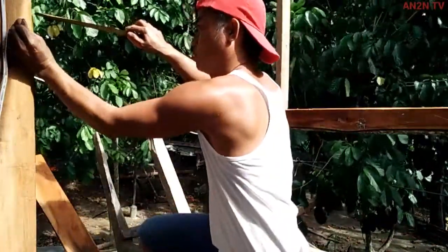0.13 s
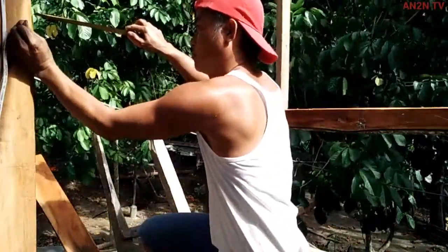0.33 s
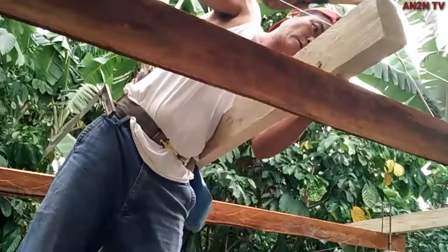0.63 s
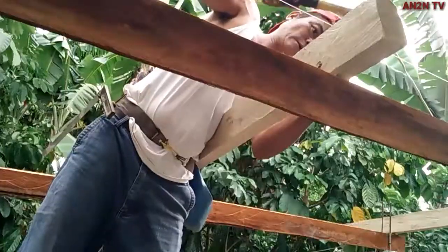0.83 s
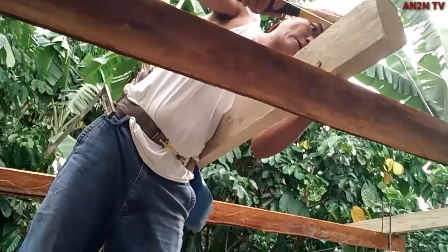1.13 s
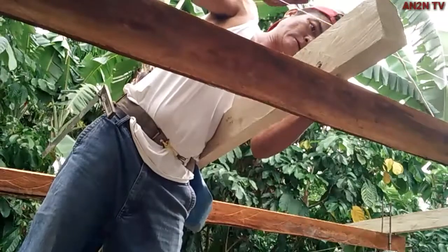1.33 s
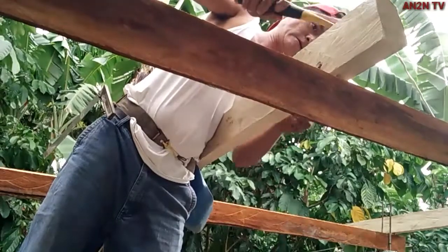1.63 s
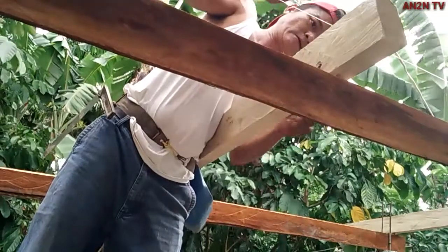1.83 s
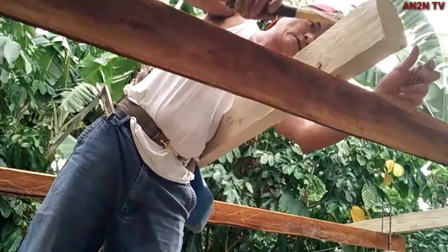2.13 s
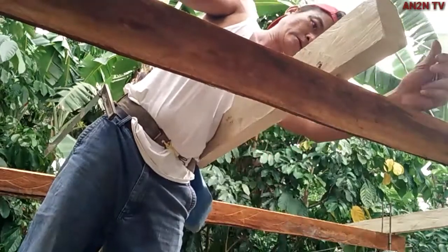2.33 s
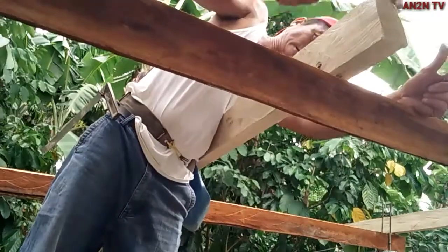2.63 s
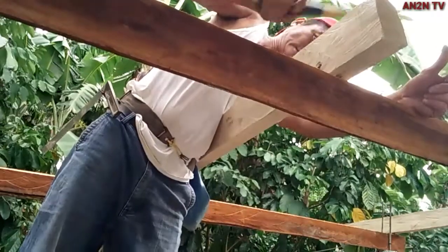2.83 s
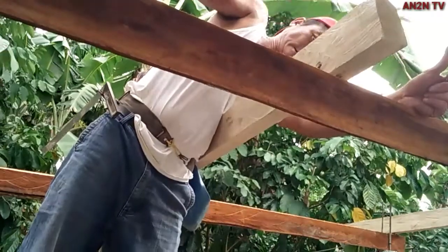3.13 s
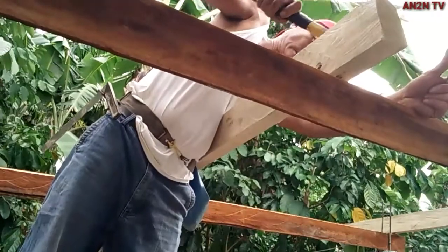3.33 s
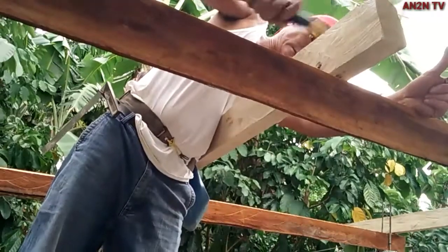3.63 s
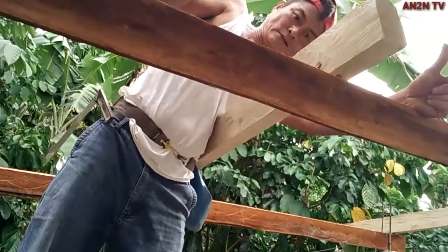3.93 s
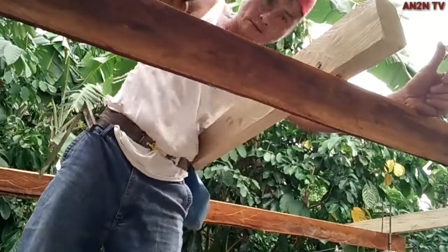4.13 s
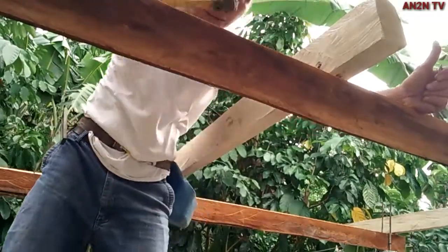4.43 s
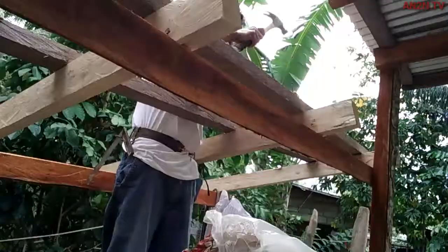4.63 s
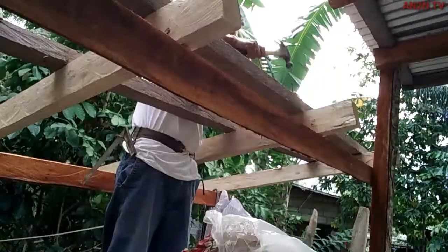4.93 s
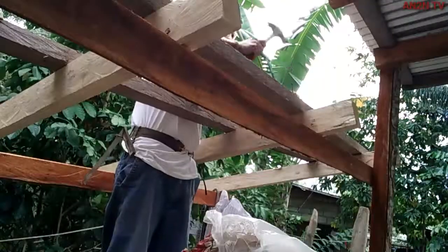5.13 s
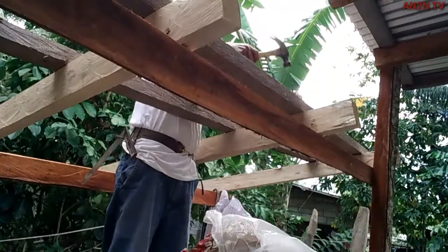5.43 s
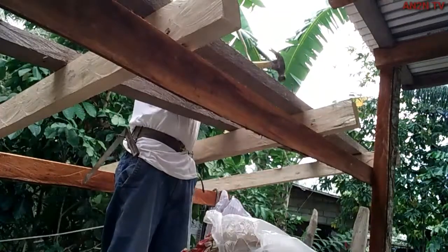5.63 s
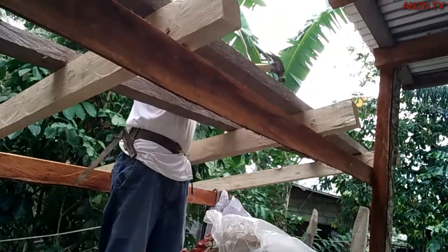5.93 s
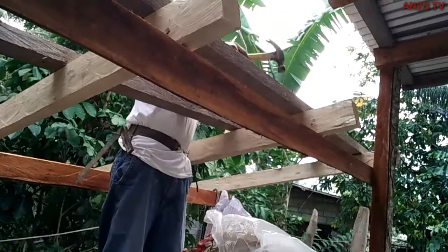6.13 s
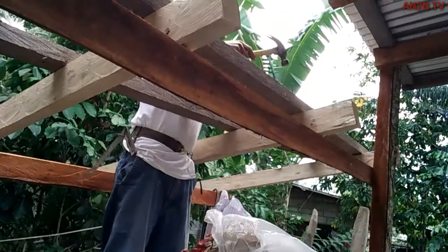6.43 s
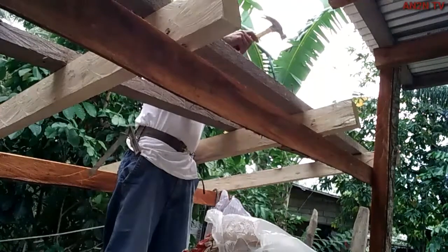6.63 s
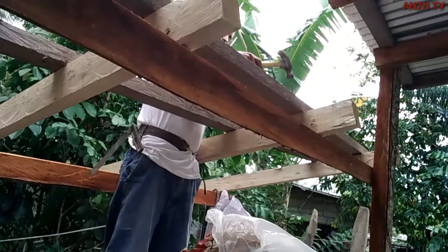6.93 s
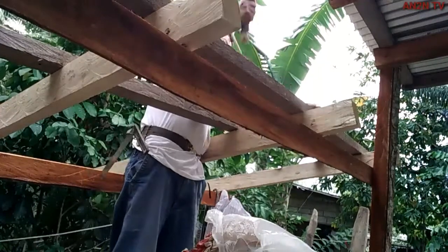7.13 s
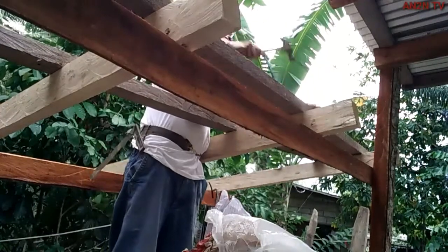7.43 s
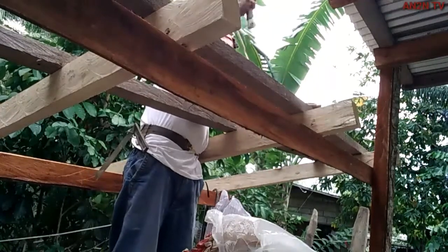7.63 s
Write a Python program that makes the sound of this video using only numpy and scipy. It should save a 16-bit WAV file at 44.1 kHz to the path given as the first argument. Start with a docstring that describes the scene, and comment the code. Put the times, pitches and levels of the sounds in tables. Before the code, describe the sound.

Close outdoor carpentry in a quiet garden. For the first 0.7 seconds there is low rumble, soft throbbing bumps and a few light wooden taps. From 0.84 a hammer drives a nail into roof framing: blows at about 0.84, 1.24, 1.72, 2.22 and a weaker one at 2.69, then three harder ones at 3.04, 3.44 and 3.82. Each has a low push, a bright steel crack, short woody ringing and a swelling hollow echo; loose timber knocks back just after. A pause follows, with faint washes of echo. Blows resume at 4.96 and 5.35, the latter with a clear nail ping, then a dull bare-wood thump at 5.85. Very faint gliding calls, like distant fowl, drift through from 4.8 to 7.1. Light taps and low bumps come around 6.6 to 7.0, then a softened blow at 7.13, a strong crack at 7.41 and a last small tap at 7.63 as the echo fades.

```python
"""A claw hammer drives nails into timber roof framing outdoors, in three runs of blows.
Each blow bends the beam with a low push, cracks on the nail and rings the wood as a set of fading notes.
A wash of echo, made of shaped noise, follows each blow: it swells, hums with steady notes and dies.
Loose wood knocks back. Around the runs come light taps, soft low bumps, short nail pings,
soft washes of echo, a rumble and hush of air, and faint gliding calls from far off."""
import sys
import numpy as np
from scipy import signal
from scipy.fft import rfft, irfft, next_fast_len
from scipy.io import wavfile

SR = 44100
rng = np.random.default_rng(int(sys.argv[2]) if len(sys.argv) > 2 else 0)


def store_wav(level_fs):
    """Save 16-bit WAV to argv[1]."""
    pcm = np.round(np.clip(np.atleast_2d(level_fs), -1, 1) * 32767)
    wavfile.write(sys.argv[1], SR, pcm.T.astype(np.int16))


N = 342657  # length of the scene in samples
# In all the tables, a t60 is the time a sound takes to fade by 60 dB.


def amp(db):
    """Turn decibels into a gain."""
    return 10 ** (np.asarray(db) / 20)


def unit(x):
    """Scale x to an rms (average strength) of 1."""
    return x / np.sqrt(np.mean(x ** 2) + 1e-20)


def along(points, hz):
    """Read a curve of (pitch [Hz], value) points at any pitch, on a log axis."""
    f, v = np.transpose(points)
    return np.interp(np.log(hz + 1), np.log(f + 1), v)


def filtered(x, response):
    """Multiply the spectrum of x by a response that depends on frequency."""
    size = next_fast_len(len(x) + 8192)
    spectrum = rfft(x, size) * response(np.fft.rfftfreq(size, 1 / SR))
    return irfft(spectrum, size)[:len(x)]


def causal(x, gain, size=8192):
    """Colour x by a gain of frequency, with nothing sounding before its start."""
    # folding the cepstrum (the spectrum of the log gain) gives the earliest possible response
    cepstrum = irfft(np.log(gain(np.fft.rfftfreq(size, 1 / SR))))
    cepstrum[1:size // 2] *= 2
    cepstrum[size // 2 + 1:] = 0
    response = irfft(np.exp(rfft(cepstrum)))[:size // 2]
    return signal.fftconvolve(x, response)[:len(x)]


def humps(modes, hz):
    """Gain of a set of resonances (pitch [Hz], width [Hz], level [dB])."""
    powers = (amp(db) ** 2 / (1 + (2 * (hz - centre) / width) ** 2) for centre, width, db in modes)
    return np.sqrt(sum(powers))


def noise(spectrum, size, lift=lambda hz: 1):
    """Noise of rms 1 with a given spectrum, lifted at resonances."""
    white = rng.standard_normal(size)
    return unit(filtered(white, lambda hz: amp(along(spectrum, hz)) * lift(hz)))


def fading(x, t60s, length):
    """Let each frequency of x die at its own speed."""
    hz, t, z = signal.stft(x, SR, nperseg=256)
    t60 = length * along(t60s, hz)[:, None]
    return signal.istft(z * amp(-60 * t / t60), SR, nperseg=256)[1][:len(x)]


def grainy(size, depth_db, rate_hz):
    """A gain that jumps about at random, breaking a noise into grains."""
    jumps = unit(filtered(rng.standard_normal(size), lambda hz: np.exp(-(hz / rate_hz) ** 2)))
    return unit(amp(depth_db * jumps))


def add(track, s, x):
    """Mix x into the track from time s."""
    part = track[max(round(s * SR), 0):][:len(x)]
    part += x[:len(part)]


# How loud the air is over time: (time [s], rumble level [dB], hush level [dB])
AIR_LEVELS = [(0, -45.5, -65), (0.42, -47.5, -71), (0.62, -54, -93), (0.76, -64, -72.5),
              (4.401, -74, -72.5), (6.401, -74.5, -73.5), (7.0, -74, -72.5), (7.77, -73, -62)]
# Colour of the low rumble: (pitch [Hz], level [dB per Hz])
RUMBLE_COLOUR = [(20, -7), (50, 2.5), (90, -5), (130, -16.5), (250, -29.5), (800, -72.5)]
# Colour of the hush of the garden: (pitch [Hz], level [dB per Hz])
HUSH_COLOUR = [(88, -23), (140, -9), (220, -28), (293, -10), (375, -20.5), (790, -12.5), (2480, -24.5),
               (2680, -27.5), (2900, -29.5), (3930, -33.5), (14400, -38.5)]


def air(rustle_db=2.5, rustle_hz=20):
    """Low rumble at the microphone and the hush of the garden, whose leaves rustle unevenly."""
    s, rumble_db, hush_db = np.transpose(AIR_LEVELS)
    level = lambda db: amp(np.interp(np.arange(N) / SR, s, db))
    hush = noise(HUSH_COLOUR, N)
    # three octaves from 300 Hz up rustle, each on its own
    octaves = [filtered(hush, lambda hz: (hz >= low) & (hz < 2 * low)) for low in 300 * 2 ** np.arange(3)]
    rustle = sum(leaves * (grainy(N, rustle_db, rustle_hz) - 1) for leaves in octaves)
    return level(rumble_db) * noise(RUMBLE_COLOUR, N) + level(hush_db) * (hush + rustle)


# Runs of soft low throbs: (start [s], length of run [s], rate [throbs per s], pitch [Hz], mean level [dB])
THROB_RUNS = [(0.005, .46, 17.3, 68, -42.5), (6.645, .21, 16.2, 100, -61), (6.887, .22, 21, 116, -56)]
# Single heavy low bumps: (time of middle [s], pitch [Hz], level [dB])
SINGLE_BUMPS = [(0.242, 66.4, -33), (1.257, 66, -26), (2.71, 95.4, -30.5)]
THROB_SCATTER_DB = 2.5  # how unevenly strong the throbs of a run are


def throbs(length=0.03):
    """Soft low bumps, each a short swell of a low tone, alone or in even runs of uneven strength."""
    track, t = np.zeros(N), np.arange(int(length * SR)) / SR
    bumps = list(SINGLE_BUMPS)
    for s, span, rate, hz, db in THROB_RUNS:
        for delay in np.arange(0, span, 1 / rate):
            bumps.append((s + delay, hz, db + rng.normal(0, THROB_SCATTER_DB)))
    for s, hz, db in bumps:
        add(track, s - length / 2, amp(db) * np.sin(2 * np.pi * hz * t) * np.hanning(len(t)))
    return track


# t60 of the low notes; above the knee it shortens by this power of pitch
WOOD_T60_S, WOOD_KNEE_HZ, WOOD_DAMPING = .55, 260, 0.67
MODE_SCATTER_DB = 2  # how much a note's strength varies from one ring to the next
WOOD_DRIFT = 0.0041  # share by which its pitch varies


def ringing(modes, length, size=SR * 3 // 4):
    """The clear notes (modes) of a joint, the high ones dying first; starts at about rms 1."""
    t = np.arange(size) / SR
    hz, db = np.transpose(modes)[:, :, None]
    hz = hz * np.exp(WOOD_DRIFT * rng.standard_normal(hz.shape))
    t60 = WOOD_T60_S * np.minimum(1, WOOD_KNEE_HZ / hz) ** WOOD_DAMPING
    sizes = amp(db + rng.normal(0, MODE_SCATTER_DB, hz.shape))
    # all start from rest, neighbouring modes in opposite directions
    signs = (-1) ** np.arange(len(hz))[:, None]
    partials = signs * sizes * np.sin(2 * np.pi * hz * t) * amp(-60 * t / (t60 * length))
    return partials.sum(axis=0) / np.sqrt(np.sum(sizes ** 2) / 2)


# Light taps and ticks: (time [s], wood level before a common lift [dB], steel level [dB], t60 [s])
TAP_TOUCHES = [(0.136, -50.5, -65, 0.19), (0.162, -48, -61, 0.084), (0.365, -60, -87, 0.12),
               (2.644, -53.5, -56, 1), (6.577, -59, -87, 0.18), (6.759, -48.5, -58, 0.092),
               (7.634, -43, -49, 0.04)]
# Colour of the wood in a tap: (pitch [Hz], level [dB per Hz])
TAP_WOOD_COLOUR = [(150, -48), (500, -10), (1300, 1), (2100, -4), (2500, -17.5), (8000, -43.5)]
# Colour of the steel in a tap: (pitch [Hz], level [dB per Hz])
TAP_STEEL_COLOUR = [(2000, -15), (6500, -7), (10000, -2), (14000, -14)]


def taps(ring_db=-2, tail_db=-20, tail_t60=0.92, wood_lift_db=6.0):
    """Light touches of hammer and nail on the wood, each with a faint, slower-fading tail."""
    track, t = np.zeros(N), np.arange(SR // 3) / SR
    for s, wood_db, steel_db, t60 in TAP_TOUCHES:
        ring = ringing(JOINT_A_MODES, 1, size=len(t))
        ring = filtered(ring, lambda hz: amp(along(TAP_WOOD_COLOUR, hz)))
        wood = amp(ring_db) * ring + .5 * noise(TAP_WOOD_COLOUR, len(t))
        steel = noise(TAP_STEEL_COLOUR, len(t))
        touch = amp(wood_db + wood_lift_db) * wood + amp(steel_db) * steel
        decay = amp(-60 * t / t60) + amp(tail_db - 60 * t / tail_t60)
        add(track, s, touch * decay * (1 - np.exp(-t / 0.00059)))
    return track


# Times at which the hammer moves to the next place: time [s]
MOVE_TIMES = [2.9, 4.5, 5.6, 6.5]
# Clear notes of the wood around each of four nails: (pitch [Hz], level [dB])
JOINT_A_MODES = [(129, -6.5), (196, -8), (292, 0.0), (444, -3.5), (608, -7.5), (753, -4), (796, -4.5),
                 (834, -5), (915, -3.5), (974, -2.5), (1173, -7), (1216, -2.5), (1402, -9), (1464, -1.5),
                 (1711, -5.5), (1773, -5), (2005, -11), (2269, -12), (2314, -4), (2527, -2.5), (2812, -9),
                 (3087, -12.5)]
JOINT_B_MODES = [(131, -7), (180, -10.5), (296, -3.5), (436, -15), (616, -7.5), (726, -4), (850, -5.5),
                 (909, -1.5), (971, -4.5), (1017, -2), (1203, -2.5), (1297, -1.5), (1464, -4.5), (1507, 3),
                 (1571, -3), (1709, 0.5), (1779, 2), (2034, -5), (2077, -6.5), (2123, -6.5), (2336, -12.5),
                 (2562, -8), (2815, -14), (3092, -14.5)]
JOINT_C_MODES = [(185, -4), (279, -9.5), (462, -4.5), (594, -6), (659, -11), (718, -8.5), (885, 0),
                 (944, -3.5), (1071, -7.5), (1135, -10.5), (1216, -12.5), (1326, -7), (1466, 0), (1593, -7),
                 (1649, -6.5), (1902, -6), (1956, -13), (1994, -4), (2271, -5.5), (2667, -10), (2912, -6)]
JOINT_D_MODES = [(234, -15.5), (285, -12), (331, -9.5), (422, -15), (479, -14), (592, -11), (667, -8),
                 (740, -17), (839, -14.5), (974, -2.5), (1044, -2.5), (1141, -6.5), (1181, -6),
                 (1305, -5.5), (1458, -3), (1652, -9), (1744, -0.5), (1999, -4.5), (2277, -9.5)]
# Clear notes of a dull blow on bare wood: (pitch [Hz], level [dB])
BARE_WOOD_MODES = [(157.6, 9), (201, -1), (262, -0.5), (292, 2.5), (435, 1.5), (464, 3), (530, -4),
                   (599, -1.5), (948, -17), (1290, -10), (1403, 3)]
# Bright resonances of each nail under the hammer head, before the wood grips it:
# (pitch [Hz], width [Hz], level [dB])
NAIL_A_MODES = [(3700, 61, 4.5), (6100, 560, -2.5), (10100, 340, -0.5), (10850, 71, -4), (12250, 17, -2.5)]
NAIL_B_MODES = [(3633, 17, -12), (6200, 880, -0.5), (8130, 510, 4), (8700, 33, 0.5), (10000, 130, -6)]
NAIL_C_MODES = [(3400, 25, -3), (4300, 100, -2.5), (6670, 270, 2.5), (7900, 56, -2.5), (10000, 31, -5),
                (12800, 100, -7)]
NAIL_D_MODES = [(4490, 72, 0.5), (5470, 40, 2.3), (6400, 38, 8), (7600, 69, 6.1), (9000, 720, 4.8)]
# How the timber yields at each place in turn, at the first blow there: (thud over force [dB],
# knock over force [dB], clack over knock [dB], rafter pitch [Hz], rafter level [dB])
TIMBER_YIELD = [(-10, -4.5, -0.5, 292, 3.5), (-8.5, -1, 0.5, 297, -2), (-13.5, 3.5, 1.5, 170, -1),
                (-5, -5.5, 0.5, 180, -15), (-11.5, -4, 1.5, 420, -6.5)]


def place(s):
    """The wood, the nail and the timber's yield where the hammer works at time s."""
    spots = [(JOINT_A_MODES, NAIL_A_MODES), (JOINT_B_MODES, NAIL_B_MODES), (JOINT_C_MODES, NAIL_C_MODES),
             (BARE_WOOD_MODES, NAIL_C_MODES), (JOINT_D_MODES, NAIL_D_MODES)]
    spot = np.searchsorted(MOVE_TIMES, s)
    return (*spots[spot], *TIMBER_YIELD[spot])


# Dips in the colour of the struck wood and the echo: (pitch [Hz], width [Hz], level [dB])
COLOUR_GAPS = [(148, 13, -9.5), (222, 19, -4.5), (371, 35, -15.5), (536, 46, -4.5), (665, 50, -4),
               (2680, 23, -4)]


def gaps(hz):
    """Gain with dips at certain pitches, shared by the struck wood and the echo."""
    dips = (db * np.exp(-(2 * (hz - centre) / width) ** 2) for centre, width, db in COLOUR_GAPS)
    return amp(sum(dips))


def body(joint, hz, cluster_hz=22, cluster_db=6):
    """Gain of the wood around a joint: its weaker modes gather around the clear ones."""
    clusters = [(centre, cluster_hz, db + cluster_db) for centre, db in joint]
    return gaps(hz) * (1 + humps(clusters, hz))


# Steady notes in the echo: (pitch [Hz], mean level [dB])
HUM_NOTES = [(132, -12), (183, -6), (200, -10.5), (288, -1), (311, -7), (412, -11.5), (828, -14),
             (930, -13)]


def hum(length, t60=0.7):
    """The steady, fading notes of the echo, each at a slightly new strength."""
    t = np.arange(SR) / SR
    notes = np.zeros(SR)
    for hz, db in HUM_NOTES:
        strength = amp(db + rng.normal(0, MODE_SCATTER_DB))
        notes += strength * np.sin(2 * np.pi * (hz * t + rng.random()))
    return notes * amp(-60 * t / (t60 * length))


# Colour of the wash of echo: (pitch [Hz], level [dB per Hz])
ECHO_COLOUR = [(30, -17), (140, -6), (290, -4), (390, -12.5), (660, -15.5), (930, -11.5), (1500, -18.5),
               (2200, -19), (3000, -28), (5100, -32), (9300, -28.5), (14400, -47.5)]
# How long the echo lasts, before its length factor: (pitch [Hz], t60 [s])
ECHO_FADE = [(60, 0.79), (300, 0.79), (1000, 0.73), (2500, 0.7), (5000, 0.68), (9000, 0.89), (14000, 1)]
# Resonances in the echo, before a common lift: (pitch [Hz], width [Hz], level [dB])
ECHO_RESONANCES = [(114, 11, -5.5), (189.5, 180, -2), (343, 24, 3.5), (455, 110, 4), (604, 31, 1.5),
                   (774, 38, -6.5), (1470, 92, -2)]
WASH_DB = -0.83  # the noisy part of the echo
HUM_FOLLOWS = 0.35  # share of the struck rafter's level (in dB) that reaches the hum


def echo(s, length, swell, hum_db, modes_db=2, joint_db=7, joint_width_hz=9):
    """A wash of echo: noise coloured by the joint's notes swells, hums with steady notes and dies."""
    t = np.arange(SR) / SR
    joint, *_, beam_db = place(s)
    near = [(hz, joint_width_hz, db + joint_db) for hz, db in joint]
    lift = lambda f: gaps(f) * (1 + amp(modes_db) * humps(ECHO_RESONANCES, f) + humps(near, f))
    wash = amp(WASH_DB) * fading(noise(ECHO_COLOUR, SR, lift), ECHO_FADE, length)
    low_wash = filtered(wash, lambda f: 1 / (1 + (f / 2600) ** 4))
    # the bright sizzle fades faster after 0.26 s
    sizzle = (wash - low_wash) * amp(-110 * np.maximum(t - .26, 0))
    steady_notes = amp(hum_db + HUM_FOLLOWS * beam_db) * hum(length)
    return (low_wash + sizzle + steady_notes) * (1 - np.exp(-t / swell)) ** .5


def push(push_hz=350, spread=0.071, second_hz=700, second_db=-6):
    """The beam flexes with a dull low swing just ahead of the crack, its pitch a little new each time."""
    t = np.arange(SR // 10) / SR
    phase = 2 * np.pi * t * np.exp(spread * rng.standard_normal())
    swing = np.sin(push_hz * phase) + amp(second_db) * np.sin(second_hz * phase)
    return swing * (1 - np.exp(-(t / .0015) ** 2)) * amp(-60 * t / .032)


# Neighbouring rafters: (pitch over the struck rafter's [ratio], level [dB])
NEIGHBOUR_RAFTERS = [(0.915, -7.5), (1.096, -2)]


def beam(hz, t60=0.48, spread=0.008):
    """The rafter's bending note beats with the notes of its neighbours and outlasts the knock."""
    t = np.arange(SR * 3 // 4) / SR
    phase = 2 * np.pi * hz * t * np.exp(spread * rng.standard_normal())
    swing = np.sin(phase) + sum(amp(db) * np.sin(ratio * phase) for ratio, db in NEIGHBOUR_RAFTERS)
    return swing * amp(-60 * t / t60) * (1 - np.exp(-t / 0.0029))


# Edges of the boom, thud, knock, clack, snap and crack bands: pitch [Hz]
ATTACK_EDGES = [40, 110, 450, 1200, 2500, 5500, 14000]
SNAP_DB, BOOM_DB = -6, -24  # snap over the force before the knock's share, boom over the crack
SNAP_FOLLOWS = 0.57  # share of the knock's gain (in dB) that reaches the snap
CONTACT_ORDER = 3  # how steeply a soft contact loses the top


def attack_levels(force_db, contact_hz, thud_db, knock_db, clack_db):
    """Band levels of a blow: all follow its force, a soft contact loses the top, only a sharp one booms."""
    centres = np.sqrt(np.multiply(ATTACK_EDGES[1:-1], ATTACK_EDGES[2:]))
    softness_db = -10 * np.log10(1 + (centres / contact_hz) ** (2 * CONTACT_ORDER))
    snap_db = SNAP_DB + SNAP_FOLLOWS * knock_db
    colour_db = np.array([thud_db, knock_db, knock_db + clack_db, snap_db, 0])
    levels_db = force_db + colour_db + softness_db
    return np.r_[levels_db[-1] + BOOM_DB, levels_db]


def voiced(x, levels_db, inset=1.4, size=1400):
    """Colour a blow by comparing the power of its attack in each band with the wanted level."""
    power = abs(rfft(x[:size], 8192)) ** 2 * 2 / (8192 * size)
    have = np.histogram(np.fft.rfftfreq(8192, 1 / SR), ATTACK_EDGES, weights=power)[0]
    gain_db = np.asarray(levels_db) - 10 * np.log10(have)
    # the gain is flat inside each band and slides across the edges
    corners = np.c_[np.multiply(ATTACK_EDGES[:-1], inset), np.divide(ATTACK_EDGES[1:], inset)].ravel()
    curve = np.c_[corners, np.repeat(gain_db, 2)]
    return causal(x, lambda hz: amp(along(curve, hz)))


# Colour of the crowd of weaker timber modes: (pitch [Hz], level [dB per Hz])
TIMBER_COLOUR = [(30, -30.5), (70, -11), (140, -8), (300, -6), (480, -3), (900, 0.5), (2050, 1.5),
                 (2450, -8.5), (4800, -15.5), (9000, -8.5), (12000, -15), (14500, -23)]
# How long they ring, before the blow's length factor: (pitch [Hz], t60 [s])
TIMBER_FADE = [(80, 0.85), (300, 0.059), (900, 0.53), (2000, 0.29), (5000, 0.33), (9000, 0.31),
               (14000, 0.46)]


def strike(joint, nail, length, modes_db=4.5, sustain=0.86, nail_db=3, grip_hz=120, crack_db=6,
           crack_t60=0.047, bite_db=3, bite_t60=0.057, rise=0.0013):
    """One blow: the joint's clear modes, a crowd of weaker ones and the crack of steel on steel."""
    ring = amp(modes_db) * ringing(joint, length * sustain)
    t = np.arange(len(ring)) / SR
    # the wood grips the nail and broadens its resonances
    gripped = [(hz, width + grip_hz, db) for hz, width, db in nail]
    steel = lambda f: 1 + amp(nail_db) * humps(gripped, f)
    crowd = noise(TIMBER_COLOUR, len(t), lambda f: steel(f) * body(joint, f))
    crowd = fading(crowd, TIMBER_FADE, length)
    crack = noise(TIMBER_COLOUR, len(t), lambda f: steel(f) * (f / (f + 3500)) ** 2)
    crack = crack * amp(crack_db - 60 * t / crack_t60)
    # the nail goes in by jerks
    jerks = grainy(len(t), depth_db=3.2, rate_hz=240)
    # fibres crush around the nail in a short burst
    bite = noise(TAP_WOOD_COLOUR, len(t), lambda f: body(joint, f)) * amp(bite_db - 60 * t / bite_t60)
    # the wood takes a moment to get moving; the crack is immediate
    return (ring + crowd + bite * jerks) * (1 - np.exp(-t / rise)) + crack * jerks


def rebound(joint, click_db, length=.3, rough_db=1, t60=0.013, click_t60=.018):
    """Wood meets wood: a dry click at once, then a short, dull ring of the same joint."""
    t = np.arange(SR // 5) / SR
    scuff = noise(TAP_WOOD_COLOUR, len(t), lambda hz: body(joint, hz)) * amp(rough_db - 60 * t / t60)
    click = noise(TIMBER_COLOUR, len(t), lambda hz: hz / (hz + 1500)) * amp(click_db - 60 * t / click_t60)
    return (ringing(joint, length, size=len(t)) + scuff) * (1 - np.exp(-t / 0.0011)) + click


def blows_before(s):
    """How many blows the hammer has already struck at the present place."""
    spot = np.searchsorted(MOVE_TIMES, s)
    return sum(row[0] < s and np.searchsorted(MOVE_TIMES, row[0]) == spot for row in HAMMER_BLOWS)


# Hammer blows, levels before common trims: (time [s], force [dB], pitch above which the contact
# weakens [Hz], ring length [factor, at least 0.3 is used], echo level [dB])
HAMMER_BLOWS = [(0.842, -20.5, 15000, 0.64, -23), (1.242, -20.5, 15000, 0.7, -21),
                (1.724, -22, 15000, 0.79, -23), (2.222, -21, 15000, 0.76, -22),
                (2.692, -25, 15000, 0.62, -28.5), (3.037, -16, 15000, 0.85, -20),
                (3.439, -16, 13000, 0.91, -21), (3.823, -16.5, 9500, 0.94, -21.5),
                (4.96, -21, 15000, 0.67, -23.5), (5.354, -21, 15000, 0.69, -21.5),
                (5.852, -20.5, 1292, 0.7, -24.5), (7.130, -16.5, 4020, 0.41, -27.5),
                (7.408, -14, 15100, 0.64, -17.5)]
# The loose rafter knocks back on its seat after a blow, levels before a common trim:
# (time [s], level [dB], click over the knock [dB])
RAFTER_REBOUNDS = [(0.914, -29.5, -1), (1.267, -16, 2.5), (1.764, -17.5, -3), (2.258, -17, -3),
                   (3.055, -8.5, -2), (3.08, -24, -2), (3.459, -15.5, -1), (3.523, -27, -8),
                   (3.85, -16, -4.5), (3.868, -15.5, -7.5), (5.383, -9, -8.5), (7.415, -5, -17.5)]
# Soft washes of echo with no blow before them, levels before a common trim:
# (time [s], level [dB], length [factor])
SOFT_ECHOES = [(0.139, -45, 0.85), (0.457, -45, 1.44), (2.637, -59.5, 8.2), (4.596, -44.5, 0.83),
               (4.667, -45, 1.36), (6.577, -65, 0.75)]
SINK_DB = 1  # each blow sinks the nail, so the next one knocks the wood this much harder


def hammer(blow_db=-1, push_db=7, rebound_db=-1, blow_swell=0.057, soft_swell=0.094, soft_db=1):
    """The blows and their echo, moving from joint to joint; the wood answers more as each nail sinks."""
    track = np.zeros(N)
    lead = .0068  # the beam starts to move this many seconds before the crack
    for s, force_db, contact_hz, length, echo_db in HAMMER_BLOWS:
        joint, nail, thud_db, knock_db, clack_db, beam_hz, beam_db = place(s)
        knock_db = knock_db + SINK_DB * blows_before(s)
        levels_db = attack_levels(force_db, contact_hz, thud_db, knock_db, clack_db)
        blow = voiced(strike(joint, nail, max(length, .3)), levels_db)
        add(track, s, amp(blow_db) * blow)
        add(track, s - lead, amp(force_db + (thud_db + knock_db) / 2 + push_db) * push())
        add(track, s - lead, amp(force_db + thud_db + beam_db) * beam(beam_hz))
        add(track, s, amp(echo_db) * echo(s, length=0.83, swell=blow_swell, hum_db=-4.5))
    for s, db, click_db in RAFTER_REBOUNDS:
        add(track, s, amp(db + rebound_db) * rebound(place(s)[0], click_db))
    for s, db, length in SOFT_ECHOES:
        add(track, s, amp(db + soft_db) * echo(s, length, soft_swell, hum_db=-1.0))
    return track


# A nail, or the wood that holds it, sings out or ticks:
# (time [s], pitch [Hz], spread of pitch [Hz], level [dB], t60 [s])
NAIL_PINGS = [(1.241, 10800, 937, -21, .17), (2.694, 10780, 198.5, -20, 0.071),
              (3.279, 10800, 4300, -42.5, 0.052), (5.355, 4300, 200, -19, 0.052),
              (5.36, 895, 5.6, -15, 0.2)]


def pings():
    """A nail struck off centre sings or ticks briefly, roughened by the wood's grip: a band of noise."""
    track, t = np.zeros(N), np.arange(SR // 4) / SR
    for s, hz, width_hz, db, t60 in NAIL_PINGS:
        white = rng.standard_normal(len(t))
        note = unit(filtered(white, lambda f: np.exp(-((f - hz) / width_hz) ** 2)))
        add(track, s, note * amp(db - 60 * t / t60))
    return track


# Faint far calls: (time [s], length [s], start pitch [Hz], end pitch [Hz], level [dB])
CALL_NOTES = [(4.80, .17, 1000, 1200, -61), (4.785, .06, 2520, 2540, -67), (4.87, .09, 750, 780, -61),
              (5.08, .16, 2180, 2130, -62), (5.64, .21, 525, 480, -60), (5.73, .08, 1400, 1390, -71),
              (6.10, .08, 945, 950, -64), (6.52, .06, 925, 940, -68), (7.04, .09, 950, 935, -66)]


def far_calls():
    """Thin gliding notes, like distant fowl, wavering on their way."""
    track = np.zeros(N)
    for s, length, start_hz, end_hz, db in CALL_NOTES:
        glide = np.linspace(start_hz, end_hz, int(length * SR))
        waver = unit(filtered(rng.standard_normal(len(glide)), lambda hz: hz < 60))
        note = np.sin(2 * np.pi * np.cumsum(glide) / SR + .8 * waver)
        add(track, s, amp(db) * note * signal.windows.tukey(len(glide)))
    return track


def scene():
    """Everything at one microphone."""
    return (air() + throbs() + taps() + hammer() + pings() + far_calls())[None]


TOP_HZ = 14400  # band limit of the recorder


def record(dry, top=0.5, low_hz=42):
    """The recorder thins the deepest bass, rounds off the loudest peaks and cuts above its band limit."""
    thinned = signal.sosfilt(signal.butter(2, low_hz, "high", fs=SR, output="sos"), dry[0])
    rounded = thinned / (1 + abs(thinned / top) ** 4) ** (1 / 4)
    return signal.sosfilt(signal.ellip(12, .2, 90, TOP_HZ, fs=SR, output="sos"), rounded)[None]


dry = scene()
out = record(dry)
store_wav(out)
```